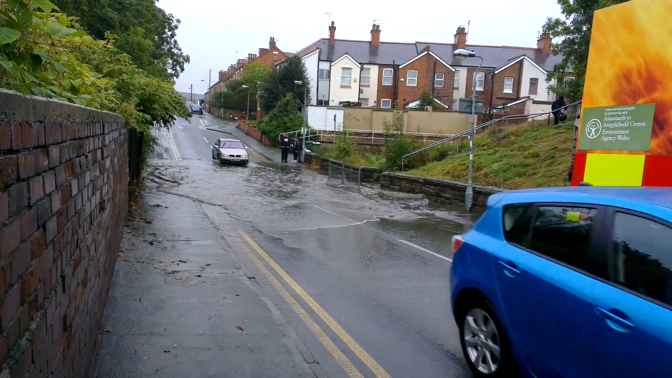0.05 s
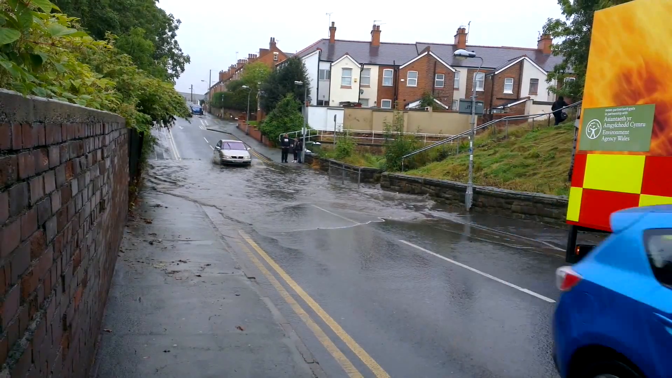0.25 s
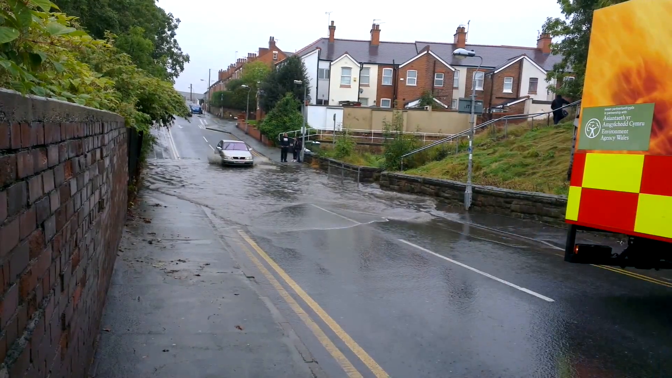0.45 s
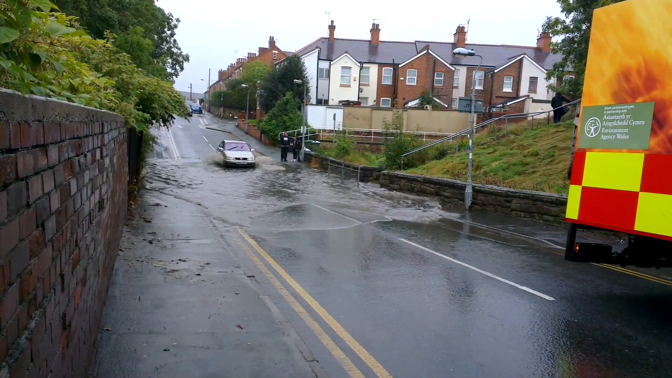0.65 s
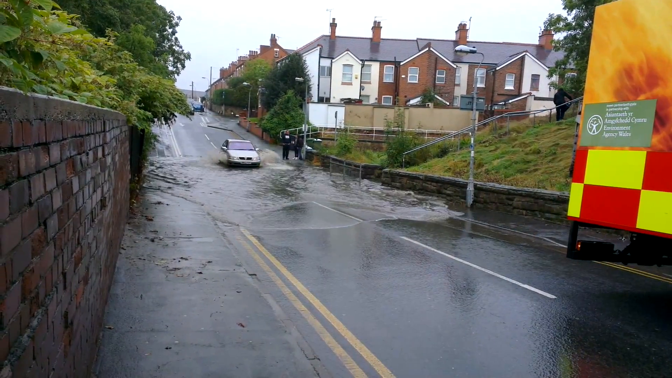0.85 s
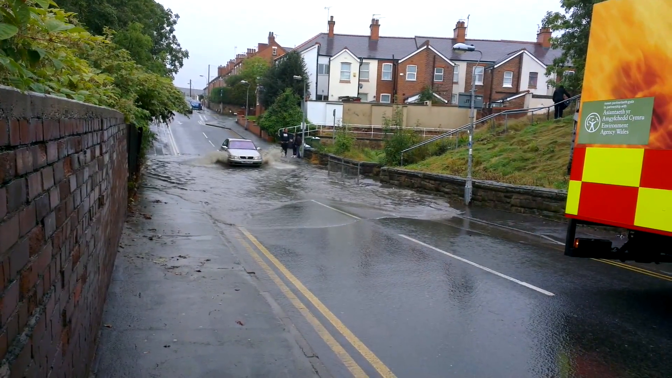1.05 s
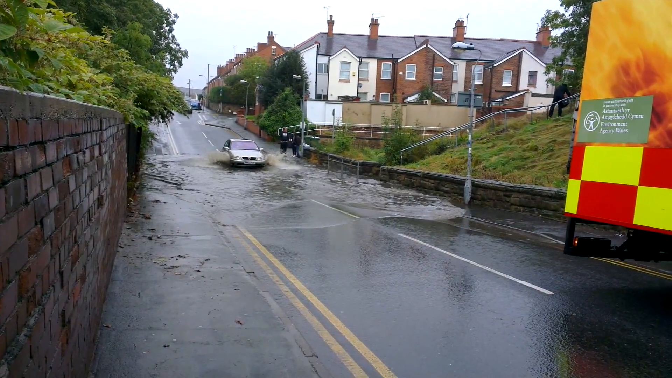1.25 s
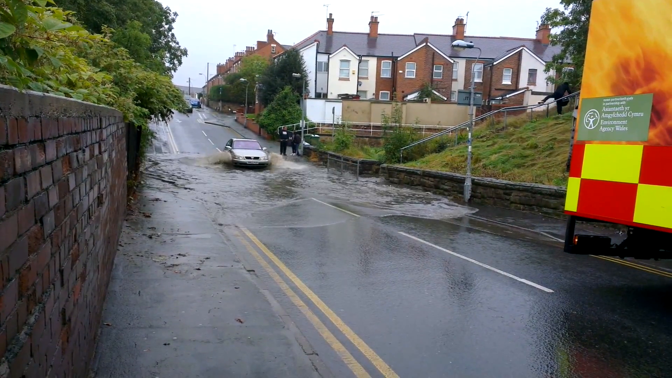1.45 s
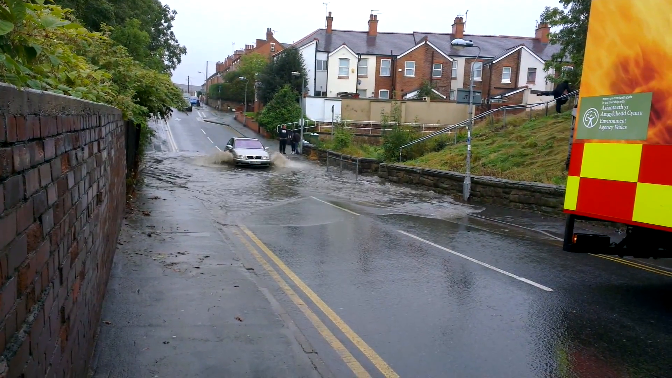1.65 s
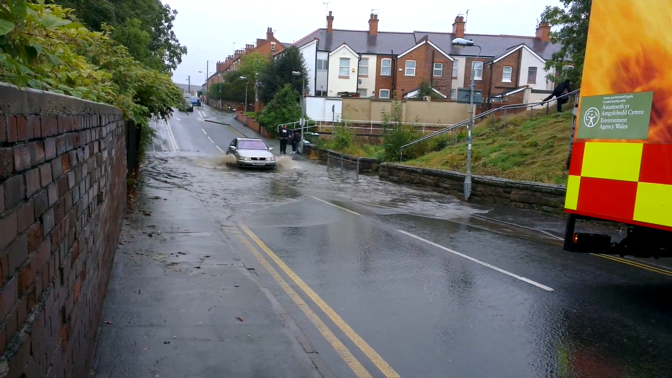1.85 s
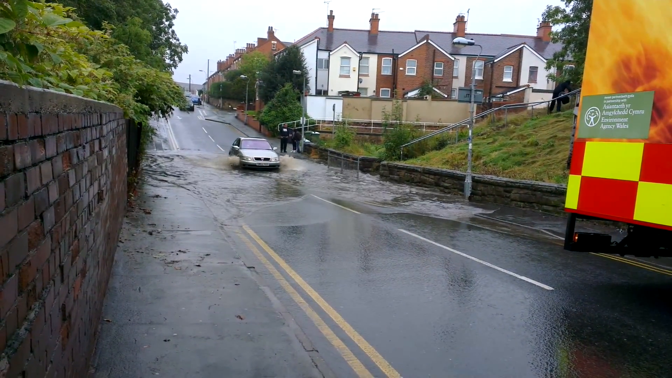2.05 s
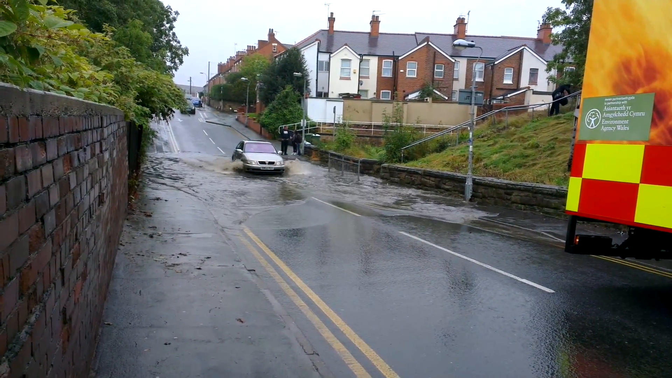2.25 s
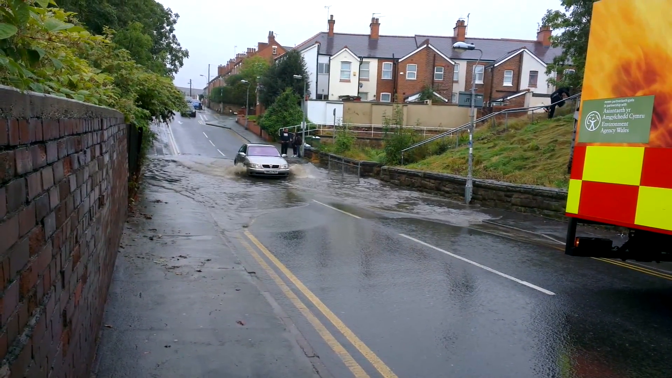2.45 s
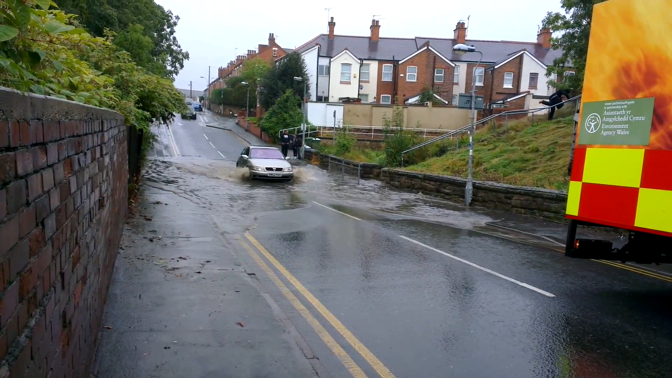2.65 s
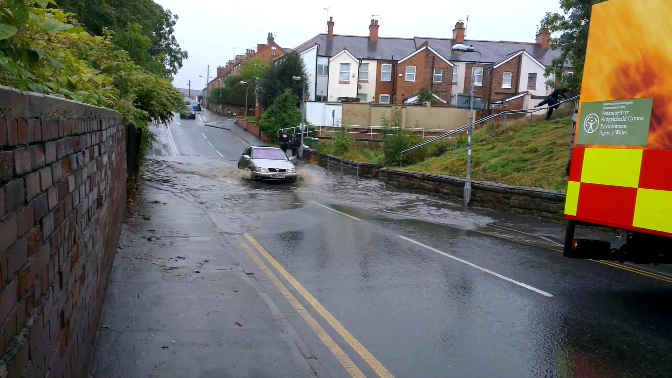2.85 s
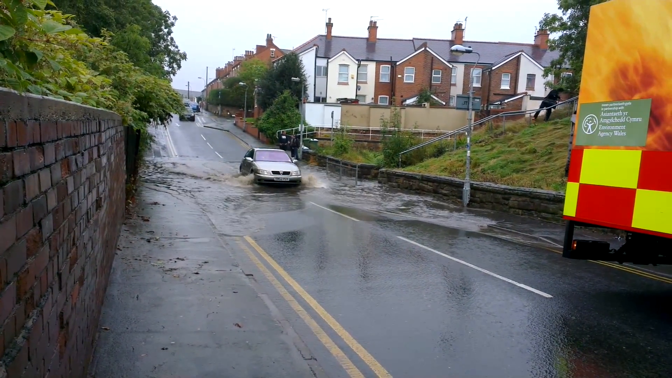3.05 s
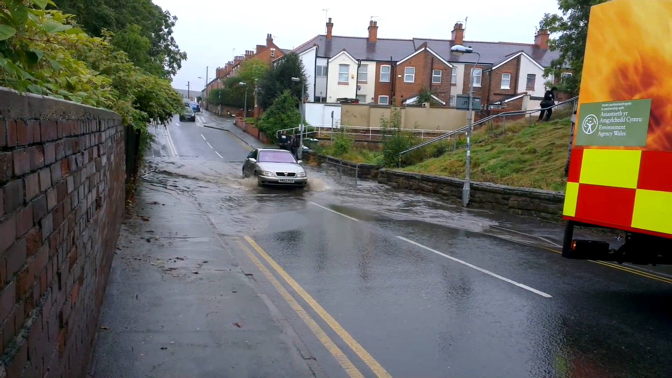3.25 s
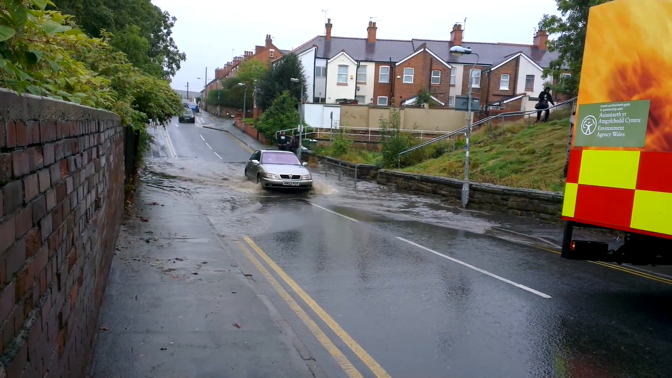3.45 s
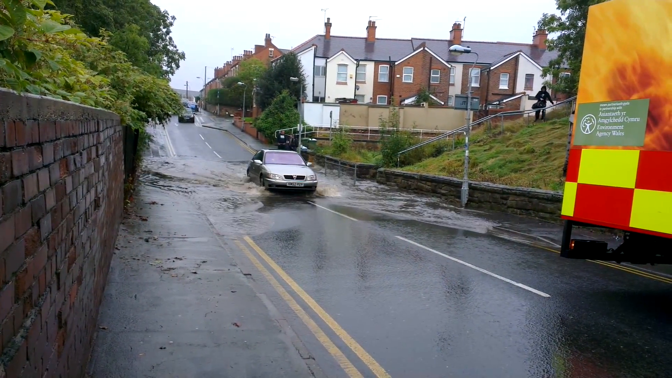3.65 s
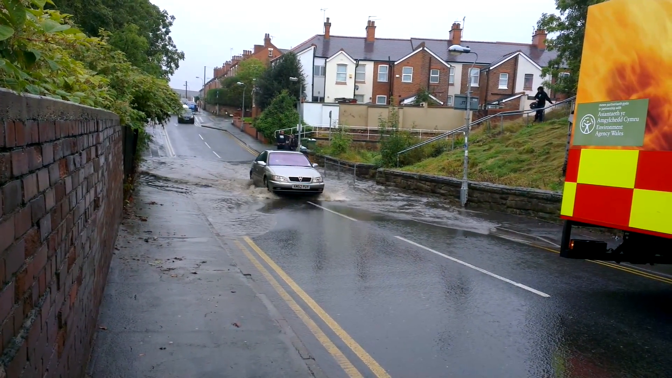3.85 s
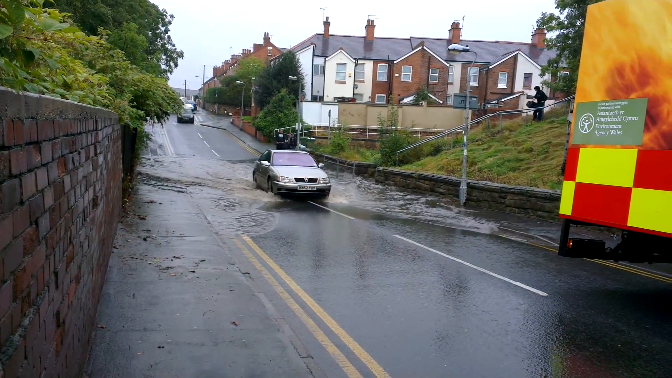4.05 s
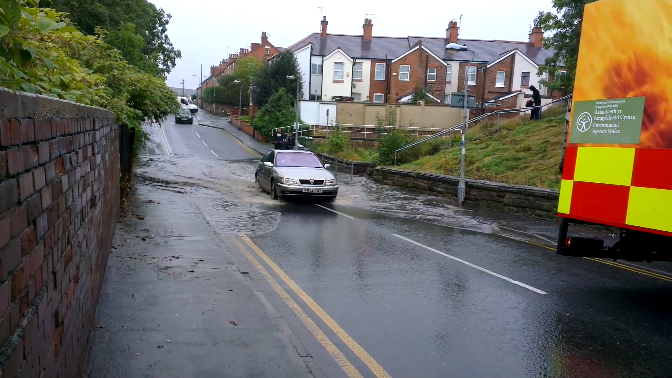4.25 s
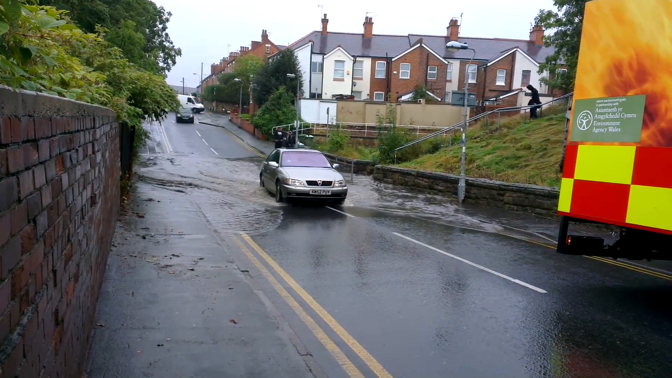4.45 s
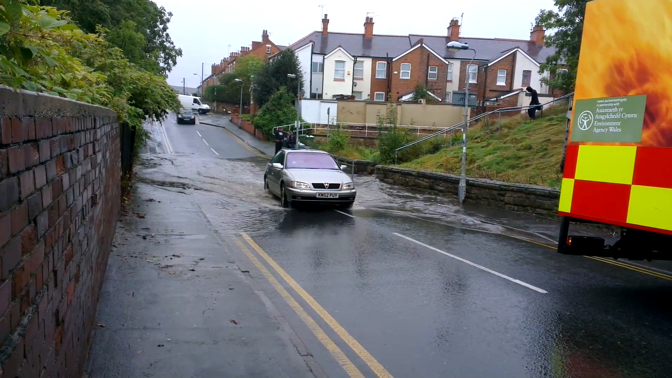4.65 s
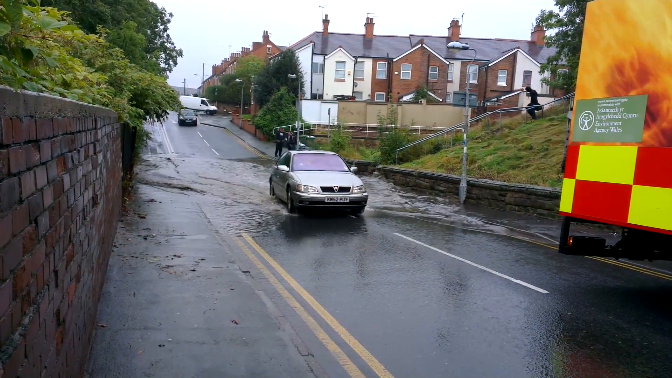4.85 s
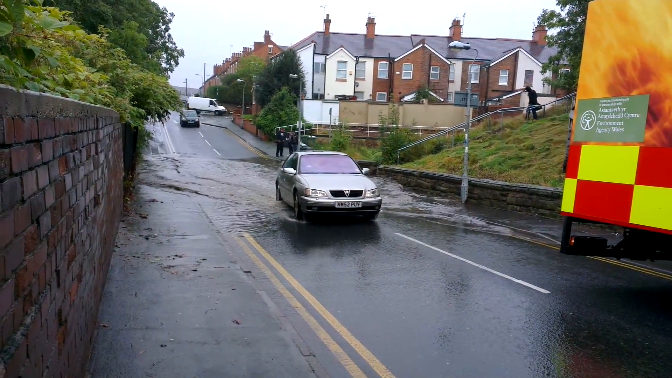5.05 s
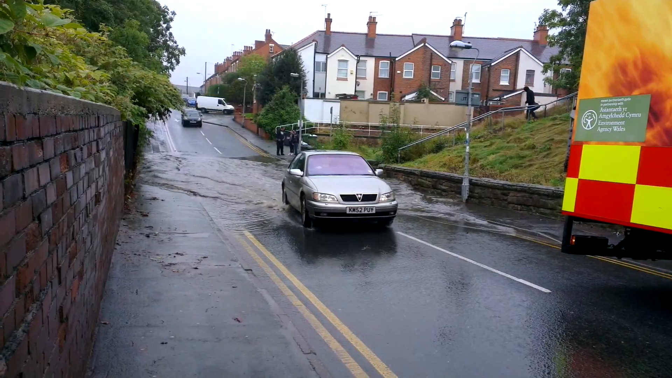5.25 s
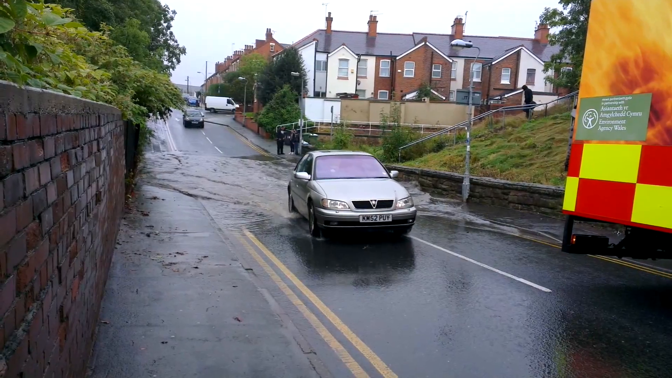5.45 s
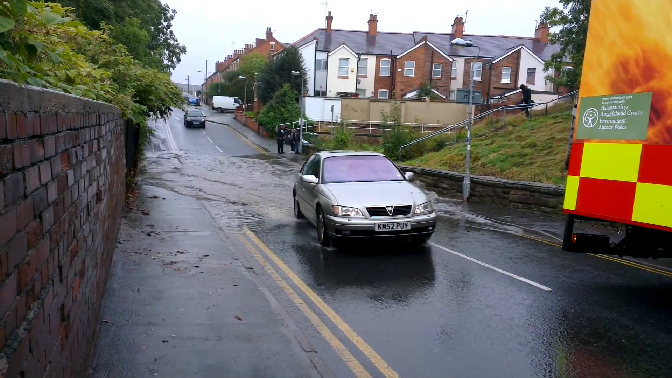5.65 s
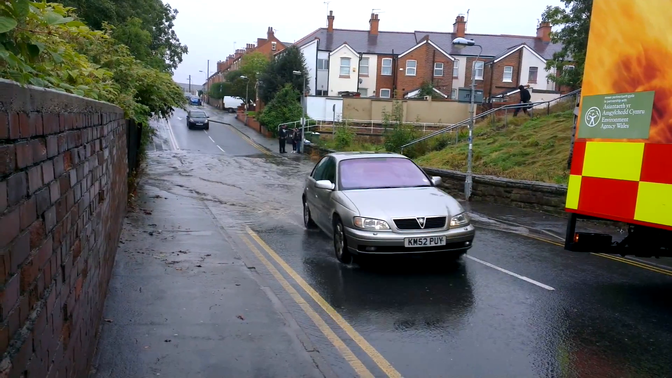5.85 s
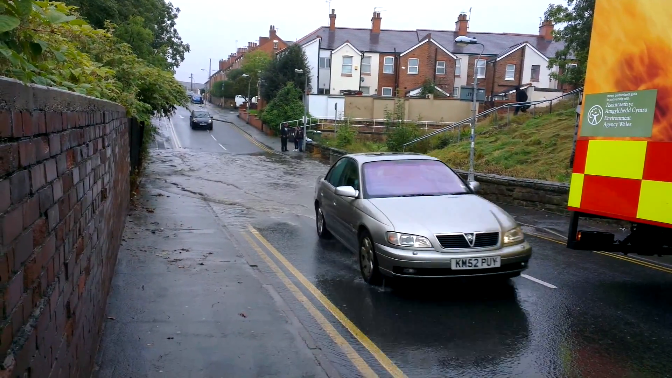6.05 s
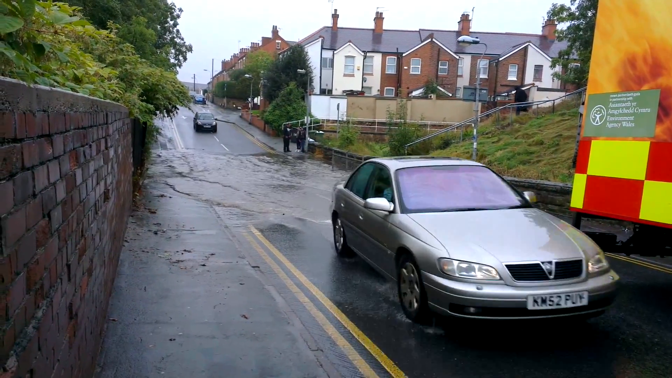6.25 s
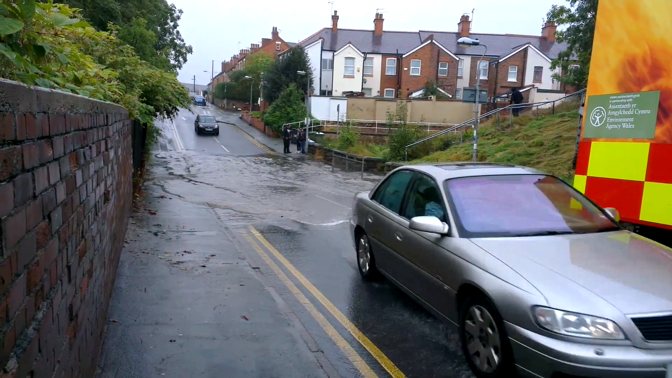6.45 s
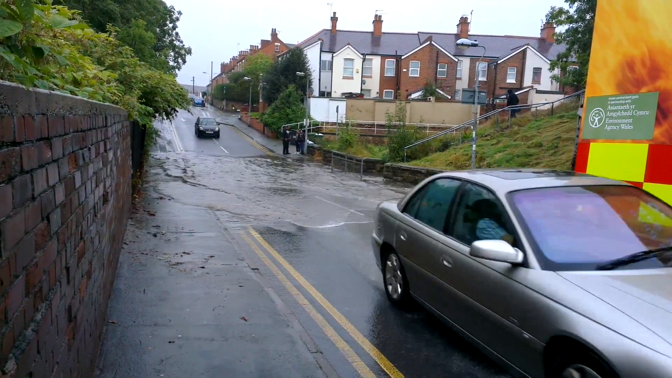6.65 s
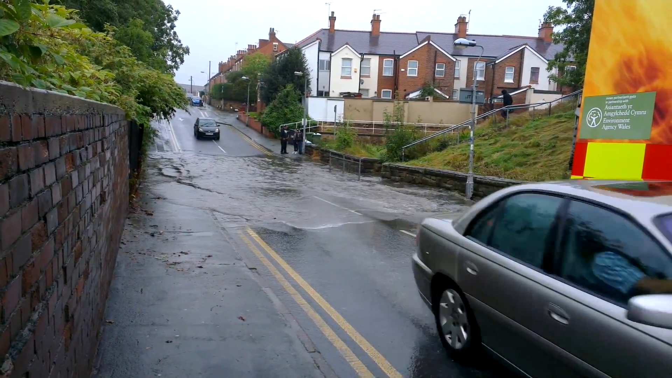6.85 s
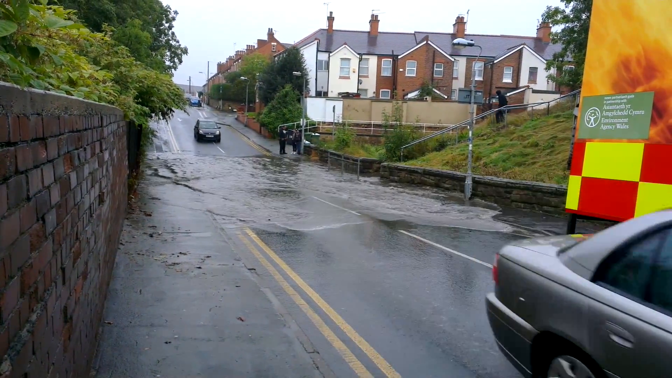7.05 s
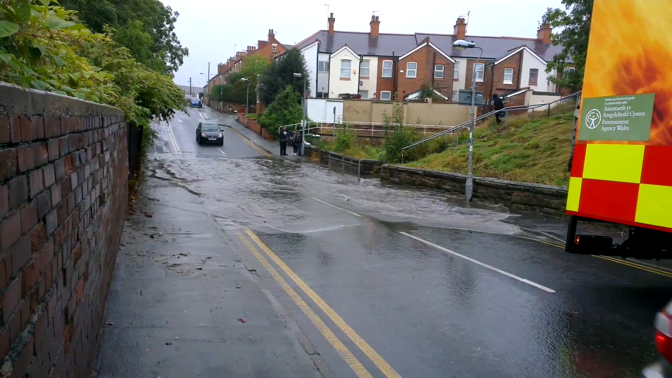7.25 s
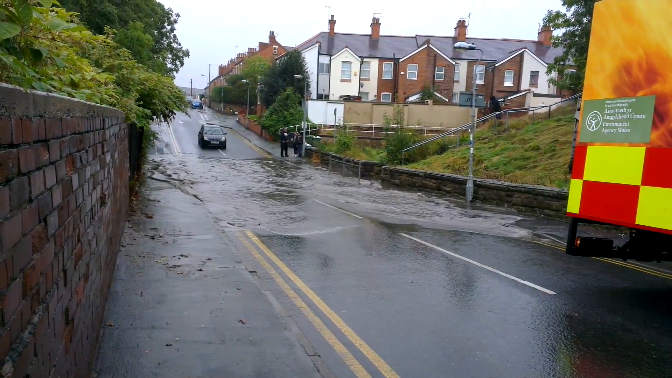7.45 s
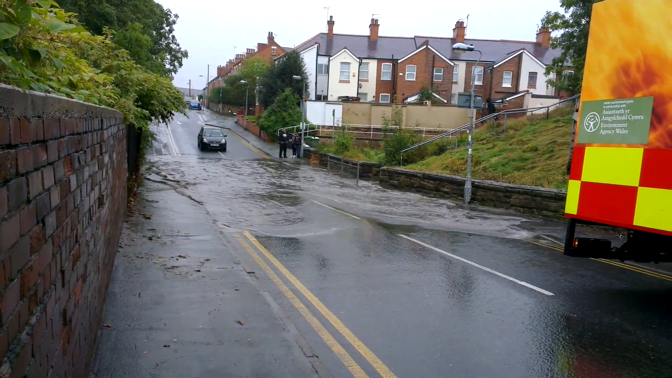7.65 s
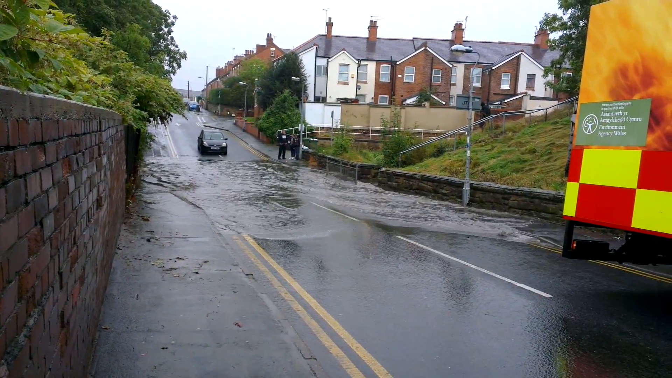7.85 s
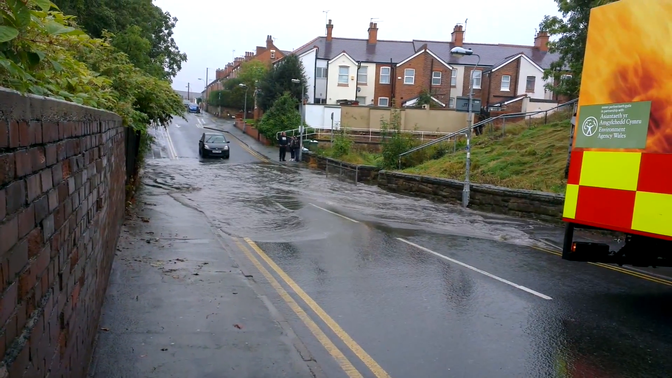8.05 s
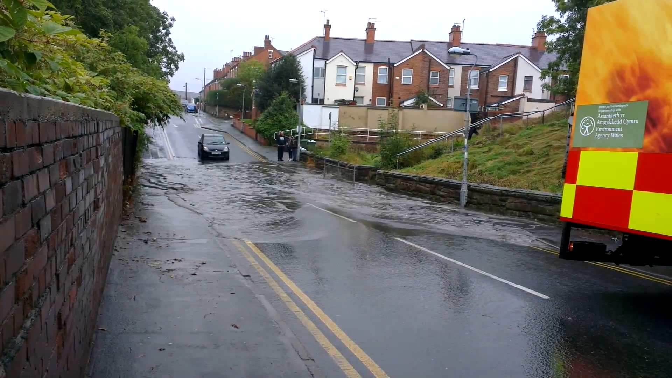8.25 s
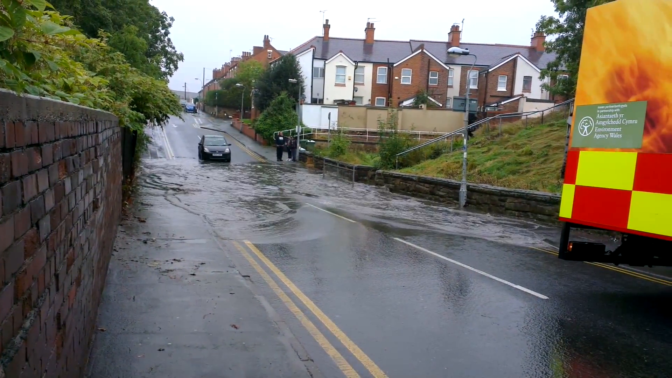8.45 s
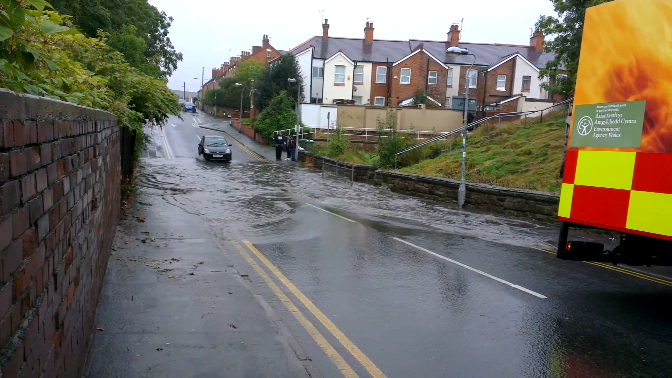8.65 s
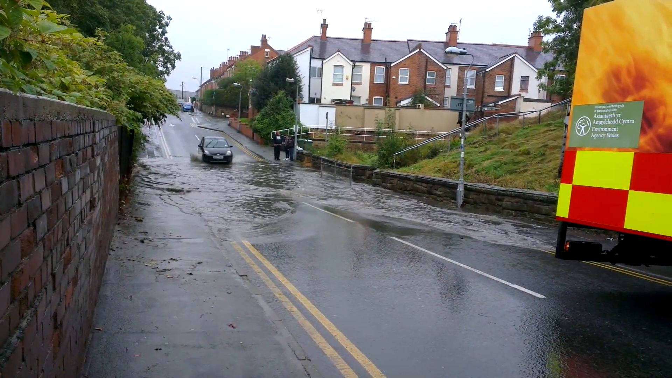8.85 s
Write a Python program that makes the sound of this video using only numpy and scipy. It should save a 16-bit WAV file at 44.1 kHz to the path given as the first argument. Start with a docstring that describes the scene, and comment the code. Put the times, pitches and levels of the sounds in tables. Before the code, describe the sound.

On a flooded wet street, a car is right at the microphone at the start, its bright tyre spray quickly fading into sloshing water. A fire engine idles steadily close by, clattering and chirping about five times a second. A second car wades nearer with a bubbling wash, then leaves the flood with a swelling hiss that peaks loudly near seven seconds and fades. A small stereo camera microphone, thin in bass, crackles on the loudest spray.

```python
"""A flooded road: cars wade through the water and hiss past on the wet asphalt, beside an idling fire engine.
One car passes at the start, the next at about 7 s. Place along the road shapes noise into a bow wave, spray,
tyre roar and a wake; single splashes and a faint falling whistle join in. The diesel is noise pulsed by its
firings, with faint harmonics and a loose part that chirps once per engine cycle.
A small stereo camera with no bass hears it all and clips on the loudest spray."""
import sys
import numpy as np
from scipy import signal
from scipy.fft import rfft, irfft, next_fast_len
from scipy.io import wavfile
from scipy.ndimage import uniform_filter1d

SR = 44100
rng = np.random.default_rng(int(sys.argv[2]) if len(sys.argv) > 2 else 0)


def digitize_waveform(pressure):
    """Quantize a signal to 16-bit integers and store it at the path in sys.argv[1].

    Rows of a 2-D input are taken as channels; values are limited to [-1, 1].
    """
    field = np.atleast_2d(pressure).T
    bounded = np.clip(field, -1, 1)
    quanta = np.round(bounded * 32767).astype(np.int16)
    wavfile.write(sys.argv[1], SR, quanta)


N = 392490
TIME = np.arange(N) / SR
# padded transform length, and the frequency of each of its bins in Hz
SIZE = next_fast_len(N + 4096)
BINS = np.fft.rfftfreq(SIZE, 1 / SR)


# cars: (time abreast [s], speed [m/s], base spray [dB], base roar [dB], wake peak [dB], wake delay [s])
CAR_PASSES = [(0, 4.7, -11, -14, -20.5, 1.12), (6.92, 4.87, -10.5, -13.5, -18.5, 0.78)]
# single splashes, in the flood or in puddles: (time [s], half width [s], spray level [dB])
SPLASHES = [(.77, 0.056, -17.5), (1.2, 0.12, -21), (2.76, 0.069, -26.5), (3.21, 0.07, -25),
            (3.55, 0.13, -30), (4.01, .07, -24.5), (4.17, .05, -28), (4.36, 0.037, -26.5)]


def traffic():
    """The distance of the nearest car, and the levels in dB of spray, roar and slosh, summed as power."""
    metres, *levels_db = zip(*(drive_by(*car) for car in CAR_PASSES))
    power = np.sum(from_db(levels_db) ** 2, axis=1)
    splash = bumps([(s, width, from_db(db)) for s, width, db in SPLASHES], TIME)
    power[0] += splash ** 2
    return np.min(metres, axis=0), *(10 * np.log10(power))


# distance from the camera to the lane
LANE_M = 4.54
# metres before the camera at which the flood starts and ends, and the width of its shallow edge
FLOOD_START_M, FLOOD_END_M, FLOOD_EDGE_M = 23.4, 9.5, 0.12
# the bow wave's level; what the tyres lose of spray and roar until they leave the flood
BOW_WAVE_DB, WADING_SPRAY_DB, WADING_ROAR_DB = -24.5, -7, -17
# the bow wave dies down from this many metres before the camera, as the water gets shallow
SHALLOWS_M, SHALLOWS_DB_PER_M = 14, 0.7
# the wake washes along the kerb behind each car: rise, hold and fall
WAKE_RISE_DB_PER_S, WAKE_HOLD_S, WAKE_FALL_DB_PER_S = 10, 0.39, 15


def drive_by(abreast_s, speed, spray_db, roar_db, wake_db, wake_delay_s):
    """One car at a steady speed: its distance, and its levels of spray, roar and slosh in dB."""
    place = speed * (TIME - abreast_s)  # metres along the road, negative before the camera
    metres = np.hypot(LANE_M, place)
    spread_db = 20 * np.log10(LANE_M / metres)
    wading = beyond(-FLOOD_END_M - place, FLOOD_EDGE_M)

    bow_wave_db = BOW_WAVE_DB - SHALLOWS_DB_PER_M * past(place + SHALLOWS_M)
    bow_wave = beyond(place + FLOOD_START_M, FLOOD_EDGE_M) * from_db(bow_wave_db)
    age = TIME - abreast_s - wake_delay_s
    wake_fade_db = WAKE_RISE_DB_PER_S * past(-age) + WAKE_FALL_DB_PER_S * past(age - WAKE_HOLD_S)
    wake = from_db(wake_db - wake_fade_db)

    return (metres,
            spray_db + spread_db + spray_level(place) + WADING_SPRAY_DB * wading,
            roar_db + spread_db + roar_level(place) + WADING_ROAR_DB * wading,
            20 * np.log10(np.hypot(bow_wave, wake)))


# spray is thrown forwards and sideways: once the car is past it drops, then keeps fading
SPRAY_BEHIND_M, SPRAY_EDGE_M, SPRAY_BEHIND_DB, SPRAY_DB_PER_M = 2.8, 0.54, -7.5, 2.5
# just out of the flood the soaked tyres throw extra spray: metres before the camera, half length, gain
SOAKED_M, SOAKED_HALF_M, SOAKED_DB = 6.1, 1.06, 2.5


def spray_level(place):
    """The dB of spray that a car at this place along the road throws towards the camera."""
    behind = place - SPRAY_BEHIND_M
    soaked_db = bumps([(-SOAKED_M, SOAKED_HALF_M, SOAKED_DB)], place)
    return soaked_db + SPRAY_BEHIND_DB * beyond(behind, SPRAY_EDGE_M) - SPRAY_DB_PER_M * past(behind)


# the tyres roar most to the rear, less to the front and least to the side
ROAR_AHEAD_DB, ROAR_SIDE_DB, ROAR_SIDE_M = -4, -4, 0.68
# the roar comes up until the car is near, and fades when it has gone by
ROAR_NEAR_M, ROAR_RISE_DB_PER_M, ROAR_GONE_M, ROAR_DB_PER_M = 1.7, .5, 9.35, 5


def roar_level(place):
    """The dB of tyre roar that a car at this place along the road sends towards the camera."""
    ahead_db = ROAR_AHEAD_DB * beyond(-place, ROAR_SIDE_M / 2)
    side_db = bumps([(0, ROAR_SIDE_M, ROAR_SIDE_DB)], place)
    rise_db = -ROAR_RISE_DB_PER_M * past(-place - ROAR_NEAR_M)
    fade_db = -ROAR_DB_PER_M * past(place - ROAR_GONE_M)
    return ahead_db + side_db + rise_db + fade_db


# spectrum of the spray's hiss: (frequency [Hz], relative level [dB])
SPRAY_SPECTRUM = [(150, -57), (500, -58), (1100, -3.5), (2200, -7.5), (3300, -0.5), (4200, 1.5),
                  (5200, -0.5), (8000, -1.5), (9800, -3), (10600, -11.5), (12000, -11.5), (15500, -24.5)]


def spray(level_db, metres, drops_db=-6, road_echo=0.029, fine_hz=8500, near_db=-13, fine_fade=0.35):
    """Tyres fling fine drops; a faint road echo lags more as the car nears, so its colour sweeps down."""
    mist = churn(patchy_db=2.0, patch_hz=894, patch_s=.04)
    mist = mist + from_db(drops_db) * drops(per_s=1500, spread_db=4.5)
    lag_s = 0.00315 / metres
    echo = np.array([np.interp(TIME - lag_s, TIME, side) for side in mist])
    hiss = at_ports(mist + road_echo * echo, over_hz(SPRAY_SPECTRUM)[0], left_db=4.5)
    # the finest mist carries least far, so the top fades faster than the rest
    high_pass = signal.butter(3, fine_hz, "high", fs=SR, output="sos")
    fine = signal.sosfiltfilt(high_pass, hiss)
    hiss = hiss - fine + fine * from_db(fine_fade * (level_db - near_db))
    return from_db(level_db + 1.13 * wander(rate_hz=28)) * hiss


# spectrum of the tread's rush: (frequency [Hz], relative level [dB])
ROAR_SPECTRUM = [(130, -69), (300, -43), (800, -11), (1400, -1.5), (2000, -1.5), (2550, -2.5), (3300, -1.5),
                 (4800, -16), (8000, -22), (15000, -78)]


def roar(level_db, spray_db, horn_db=-5.0, horn_hz=3350, horn_width_hz=700):
    """Tread squeezes water off the asphalt; the wedge between tyre and road rings like a horn."""
    tread = churn(patchy_db=2.5, patch_hz=500, patch_s=.03)
    rush = from_db(level_db) * at_ports(tread, over_hz(ROAR_SPECTRUM)[0], left_db=-0.4)
    squeeze = churn(patchy_db=3.0, patch_hz=600, patch_s=.02)
    wedge = at_ports(squeeze, resonance(horn_hz, horn_width_hz), left_db=5.5)
    # the horn follows the mean of the roar and spray levels
    horn = from_db((level_db + spray_db) / 2 + horn_db) * wedge
    return (rush + horn) * from_db(1.9 * wander(rate_hz=25))


# spectrum of the washing water: (frequency [Hz], relative level [dB])
SLOSH_SPECTRUM = [(100, -61), (190, -44), (320, -10.5), (420, -12), (580, -4), (950, 4), (1400, -3.5),
                  (2500, 2), (6000, -12), (15000, -48)]


def slosh(level_db, bubbles_db=-11, cycles=10):
    """Bow wave and wake are a dense wash with small trapped bubbles that ring with a rising pitch."""
    bubbles = np.zeros((2, N))
    age = np.arange(2048) / SR
    for hz in np.geomspace(450, 2200, num=10):
        ring = np.sin(2 * np.pi * hz * age * (1 + 3 * age))
        bubble = ring * np.exp(-2 * age * hz / cycles)
        births = drops(per_s=25, spread_db=2.0)
        bubbles += unit(signal.oaconvolve(births, bubble[None], axes=1)[:, :N])
    water = churn(patchy_db=-0.5, patch_hz=281, patch_s=0.11) + from_db(bubbles_db) * unit(bubbles)
    wash = at_ports(water, over_hz(SLOSH_SPECTRUM)[0], left_db=1.5)
    return from_db(level_db + 2.2 * wander(rate_hz=15)) * wash


# a faint falling whistle in the spray: (time [s], frequency [Hz], level [dB])
WHISTLE_GLIDE = [(5.2, 6270, -47), (5.27, 6000, -22), (5.42, 5670, -28), (5.5, 5460, -43)]


def whistle(width_hz=80):
    """A narrow, fuzzy tone that glides down: two slow noises modulate a cosine and a sine."""
    hz, level_db = over_time(WHISTLE_GLIDE)
    angle = 2 * np.pi * np.cumsum(hz) / SR
    tone = wander(width_hz) * np.cos(angle) + wander(width_hz) * np.sin(angle)
    sounding = (TIME > WHISTLE_GLIDE[0][0]) * (TIME < WHISTLE_GLIDE[-1][0])
    return tone * from_db(level_db) * sounding


# engine cycles per second, in each of which every cylinder fires once
CYCLE_HZ, FIRST_FIRING_S = 5.006, .185
# spectrum of the idling engine: (frequency [Hz], relative level [dB])
DIESEL_SPECTRUM = [(40, -52), (110, -45), (175, -35.5), (265, -11), (335, -5), (420, -7.5), (700, 3),
                   (1100, 5.5), (3400, 3), (4300, 3), (5000, -4.5), (7500, -8.5), (10000, -15),
                   (15500, -42)]
# clatter of the six cylinders in firing order: relative level [dB]
CYLINDER_CLATTER = [3, -1, 0, -2, 2, -.5]


def diesel(level_db=-21.0, steady=0.78, alike=0.51):
    """Each firing rattles the block over steady fan noise."""
    # the block answers partly the same way in every cycle
    period = round(SR / CYCLE_HZ)
    repeated = rng.standard_normal((2, period))[:, np.arange(N) % period]
    fresh = rng.standard_normal((2, N))
    rattle = np.sqrt(alike) * repeated + np.sqrt(1 - alike) * fresh
    blows = firings(CYLINDER_CLATTER, rise_s=0.0046, decay_s=0.019)
    clatter = rattle * np.sqrt(steady ** 2 + blows ** 2)
    return from_db(level_db) * at_ports(clatter, over_hz(DIESEL_SPECTRUM)[0], left_db=0.2)


def firings(levels_db, rise_s, decay_s):
    """The envelope of one blow per cylinder, repeated every engine cycle; rms 1."""
    count = len(levels_db)
    turn = (TIME - FIRST_FIRING_S) * CYCLE_HZ
    envelope = np.zeros(N)
    for k, level_db in enumerate(levels_db):
        cycle, part = np.divmod(turn - k / count, 1)
        age = part / CYCLE_HZ
        uneven_db = 0.61 * rng.standard_normal(size=64)[cycle.astype(int)]
        blow = (1 - np.exp(-age / rise_s)) * np.exp(-age / decay_s)
        envelope += from_db(level_db + uneven_db) * blow
    return unit(envelope)


# a loose metal part chirps once in every engine cycle: lag after the first firing, half width, level, spread
CHIRP_LAG_S, CHIRP_S, CHIRP_DB, CHIRP_SPREAD_DB = .011, .014, -26.5, 2
# a softer chirp comes just before each one
SOFT_LEAD_S, SOFT_DB = .064, -29
# now and then it catches harder: (time [s], level [dB])
HARD_CHIRPS = [(1.2, -21), (1.8, -23), (2.6, -19.5), (3, -21.5), (3.2, -16.5), (3.8, -21), (4.2, -21),
               (4.6, -22.5), (5, -20), (8.2, -18)]


def chirps(ring_hz=4270, width_hz=370, rough_db=5.5):
    """A loose part rubs unevenly each time the engine rocks, and rings in one broad resonance."""
    turn = (TIME - FIRST_FIRING_S - CHIRP_LAG_S) * CYCLE_HZ
    cycle = np.round(turn).astype(int)
    level_db = CHIRP_DB + CHIRP_SPREAD_DB * rng.standard_normal(size=64)
    for s, db in HARD_CHIRPS:
        level_db[cycle[round(s * SR)]] = db
    age = (turn - cycle) / CYCLE_HZ
    main = (0, CHIRP_S, from_db(level_db[cycle]))
    soft = (-SOFT_LEAD_S, CHIRP_S, from_db(SOFT_DB))
    envelope = bumps([main, soft], age)
    slips = from_db(rough_db * wander(rate_hz=170)) * rng.standard_normal((2, N))
    return envelope * at_ports(slips, resonance(ring_hz, width_hz), left_db=1.0)


# steady engine tones: (multiple of the firing rate [1], level [dB])
ENGINE_HARMONICS = [(15, -52), (19, -47), (37, -47), (38, -47)]


def engine_tones(waver=0.12):
    """Faint harmonics of the firing rate, whose phase wavers slightly."""
    angle = 2 * np.pi * CYCLE_HZ * len(CYLINDER_CLATTER) * TIME
    tones = np.zeros(N)
    for multiple, db in ENGINE_HARMONICS:
        tones += from_db(db) * unit(np.sin(multiple * angle + waver * wander(rate_hz=6.7)))
    return tones


# resonances of the camera's microphone case: (frequency [Hz], half width [Hz], gain [dB])
CASE_RESONANCES = [(1073, 79, 2.5), (1504, 190, 1.5), (2450, 57, 0.5), (2690, 570, 5), (6670, 950, 5)]
# the two ports: (frequency [Hz], coherence [0-1], phase by which left leads [rad])
PORT_COHERENCE = [(100, .8, 0), (340, .96, 0), (540, .8, -.5), (770, .75, -.1), (1100, .3, -1.1),
                  (1480, .35, -3.1), (1750, .2, -2.5), (2020, .2, -3), (2350, .45, -.2), (2900, .48, 0),
                  (4200, .22, 0), (6800, .35, 0), (9800, .25, 0), (14000, .15, 0)]
# balance of the two ports: (frequency [Hz], left minus right [dB])
PORT_BALANCE = [(150, -2.5), (770, 1), (1170, 2), (2000, 5), (2900, -1), (4200, -4.5), (6800, -10),
                (9800, 1), (14000, -11.5)]


def at_ports(pair, spectrum_db, left_db):
    """Colours two unrelated excitations and blends them into the two microphone ports; rms 1."""
    coherence, phase = over_hz(PORT_COHERENCE)
    left, other = rfft(pair, SIZE)
    right = (coherence * left + np.sqrt(1 - coherence ** 2) * other) * np.exp(-1j * phase)
    balance_db = over_hz(PORT_BALANCE)[0] + left_db
    balance = from_db(np.array([balance_db, -balance_db]) / 2)
    balance /= np.sqrt(np.mean(balance ** 2, axis=0))
    colour = from_db(spectrum_db + bumps(CASE_RESONANCES, BINS))
    return unit(irfft(np.array([left, right]) * balance * colour, SIZE)[:, :N])


def churn(patchy_db, patch_hz, patch_s):
    """Noise whose level varies in random patches of time and frequency, like breaking water; rms 1."""
    z = signal.stft(rng.standard_normal((2, N)), nperseg=512)[2]
    field = rng.standard_normal(z.shape[1:])
    field = uniform_filter1d(field, max(1, round(patch_hz * 512 / SR)), axis=0)
    field = uniform_filter1d(field, max(1, round(patch_s * SR / 256)), axis=1)
    patches = z * from_db(patchy_db * unit(field))
    return unit(signal.istft(patches, nperseg=512)[1][:, :N])


def drops(per_s, spread_db):
    """Sparse impacts of water drops, a few of them large; rms 1."""
    size = from_db(spread_db * np.minimum(rng.exponential(1, (2, N)), 4))
    sign = rng.choice([-1, 1], (2, N))
    hits = rng.random((2, N)) < per_s / SR
    return unit(size * sign * hits)


def wander(rate_hz):
    """A smooth random curve of rms 1 that moves up to about the given rate."""
    smooth = rfft(rng.standard_normal(SIZE)) / (1 + (BINS / rate_hz) ** 4)
    return unit(irfft(smooth, SIZE)[:N])


def resonance(centre_hz, width_hz):
    """The gain in dB of a steep band-pass at every bin."""
    detuning = (BINS ** 2 - centre_hz ** 2) / (2 * width_hz * (BINS + 1))
    return -20 * np.log10(1 + detuning ** 2)


def bumps(rows, axis):
    """A sum of bell shapes (centre, half width, height) along an axis."""
    return sum(height * np.exp(-np.minimum(((axis - centre) / width) ** 2, 20)) for centre, width, height in rows)


def beyond(metres, edge_m):
    """A smooth step from 0 to 1 as the distance passes zero."""
    return (1 + np.tanh(metres / (2 * edge_m))) / 2


def past(amount):
    """The distance or time beyond a mark, zero before it."""
    return np.maximum(amount, 0)


def over_time(rows):
    """The columns of a curve table at every sample."""
    s, *columns = np.transpose(rows)
    return [np.interp(TIME, s, c) for c in columns]


def over_hz(rows):
    """The columns of a frequency table at every bin, interpolated over log frequency."""
    hz, *columns = np.transpose(rows)
    return [np.interp(np.log(BINS + 1), np.log(hz), c) for c in columns]


def from_db(db):
    """Decibels to gain."""
    return 10 ** (np.asarray(db) / 20)


def unit(x):
    """Scales to rms 1."""
    return x / np.sqrt(np.mean(x ** 2) + 1e-20)


# the tyres cross wetter patches and their hiss and roar surge: (time [s], half width [s], height [dB])
TYRE_SURGES = [(.57, 0.024, 5.5), (.915, 0.013, 4.5), (1.09, 0.023, 3.5), (6.22, 0.089, 1.5),
               (6.56, 0.11, 2), (7.33, 0.072, 0.8), (7.705, 0.017, 3), (7.785, .011, 4.5),
               (7.885, 0.026, 5), (8.4, 0.013, 4)]
# the level of everything dips briefly: (time [s], half width [s], depth [dB])
LEVEL_DIPS = [(.66, 0.087, 1), (.98, 0.023, 3.5), (1.71, 0.02, 3.4), (3.05, 0.049, 2.5), (4.48, 0.12, 2),
              (5.83, 0.029, 7), (6.78, 0.017, 6.5), (6.855, 0.029, 6.5), (6.935, 0.023, 5.5),
              (7.83, .025, 2), (7.95, 0.032, 3.3), (8.28, 0.022, 2.5)]


def scene():
    """The passing cars and the idling fire engine."""
    metres, spray_db, roar_db, slosh_db = traffic()
    tyres = spray(spray_db, metres) + roar(roar_db, spray_db)
    tyres = tyres * from_db(bumps(TYRE_SURGES, TIME))
    cars = tyres + slosh(slosh_db) + whistle()
    fire_engine = diesel() + chirps() + engine_tones()
    return (cars + fire_engine) * from_db(-bumps(LEVEL_DIPS, TIME))


# the camera widens its stereo image with a short echo of the side signal
WIDEN_LAG_S, WIDEN_ECHO = .002012, .42
CUTOFF_HZ = 15800


def record(dry, ceiling=0.96):
    """Stereo widening; each channel then clips on the loudest spray, which adds a low crackle; the band limit."""
    mid, side = (dry[0] + dry[1]) / 2, (dry[0] - dry[1]) / 2
    late = np.pad(side, (round(WIDEN_LAG_S * SR), 0))[:N]
    side = (side + WIDEN_ECHO * late) / np.hypot(1, WIDEN_ECHO)
    clipped = np.clip([mid + side, mid - side], -ceiling, ceiling)
    low_pass = signal.firwin(511, CUTOFF_HZ, window=("kaiser", 8), fs=SR)
    return signal.oaconvolve(clipped, low_pass[None], "same", axes=1)


dry = scene()
out = record(dry)
digitize_waveform(out)
```